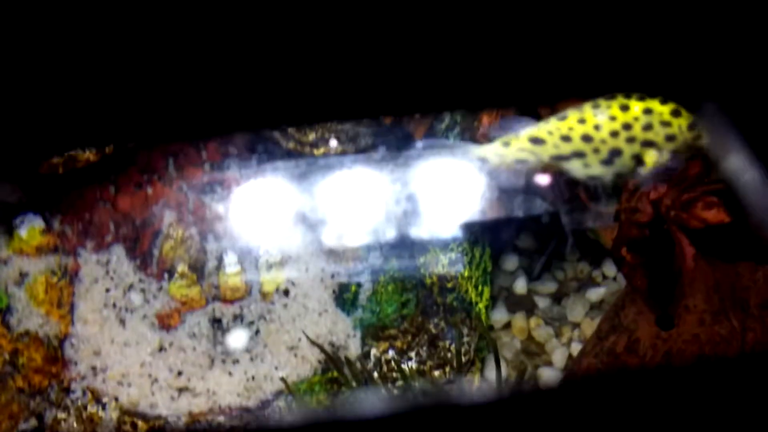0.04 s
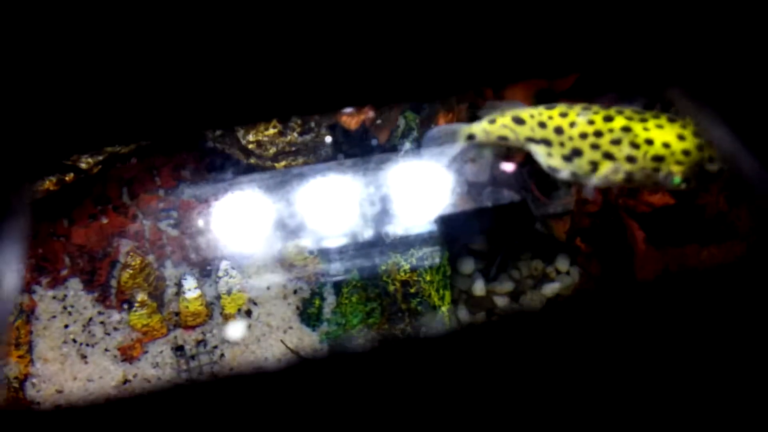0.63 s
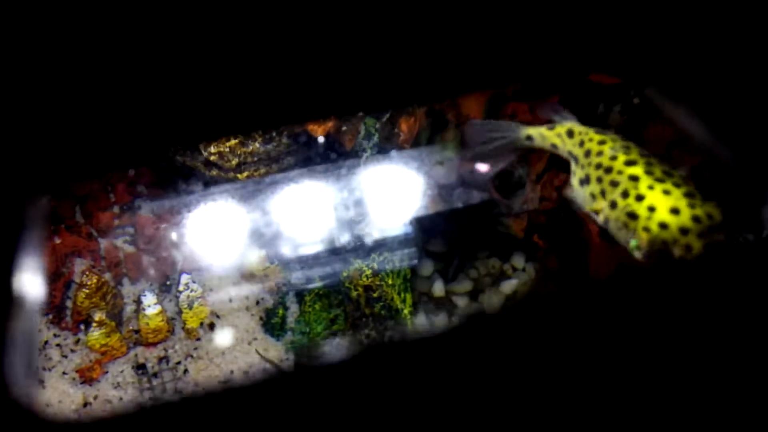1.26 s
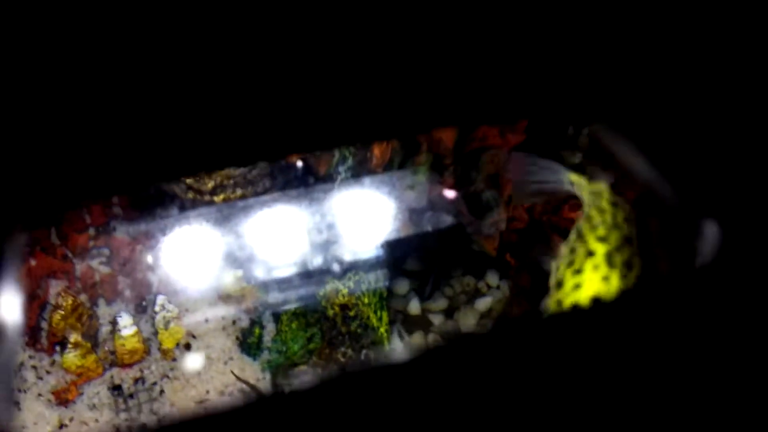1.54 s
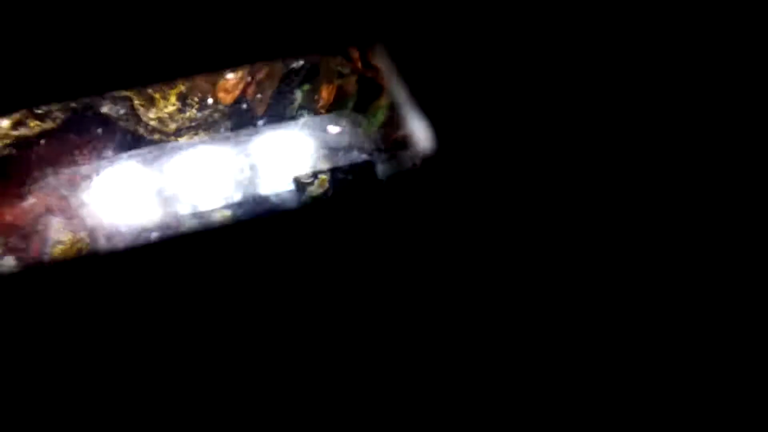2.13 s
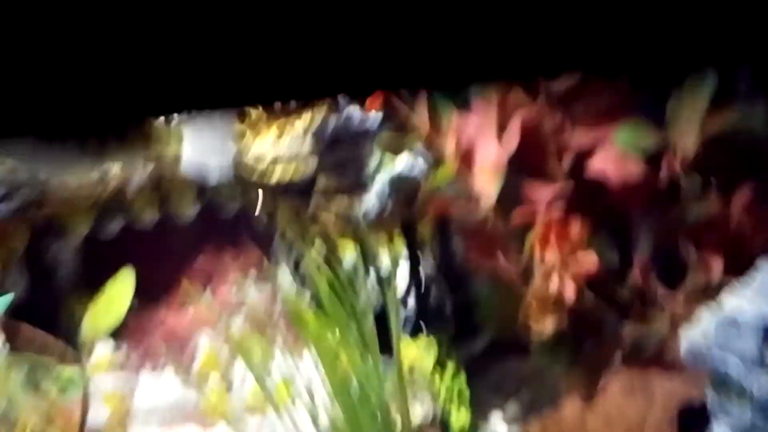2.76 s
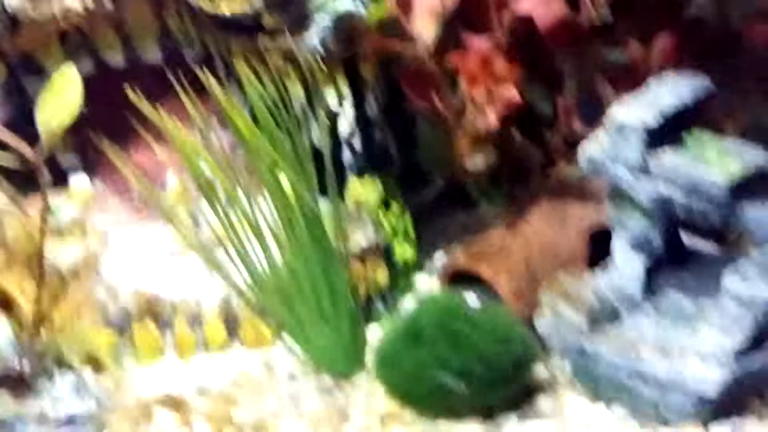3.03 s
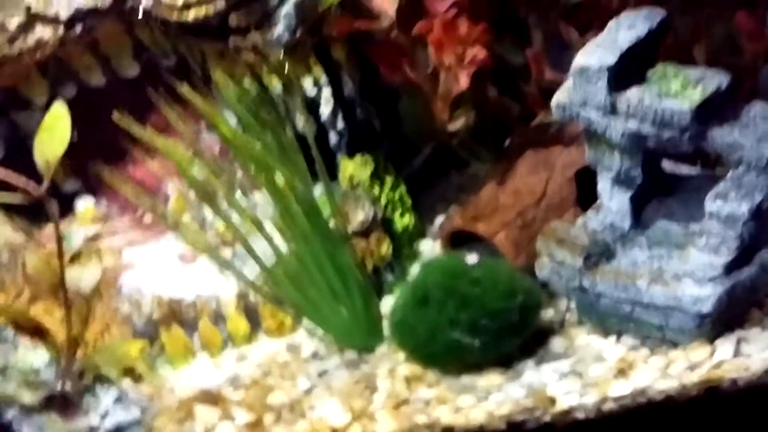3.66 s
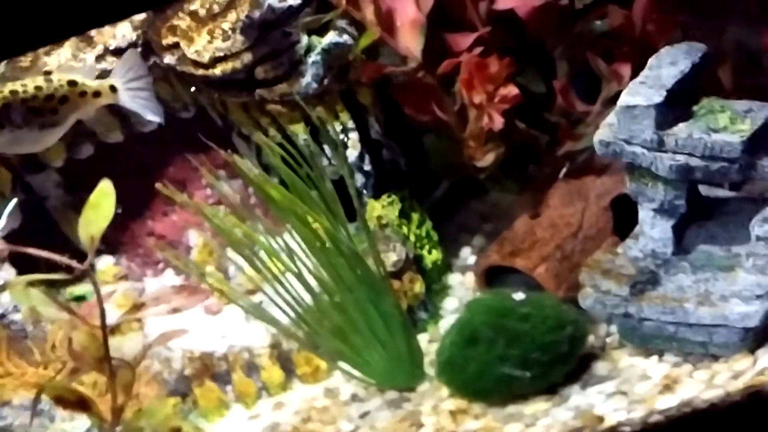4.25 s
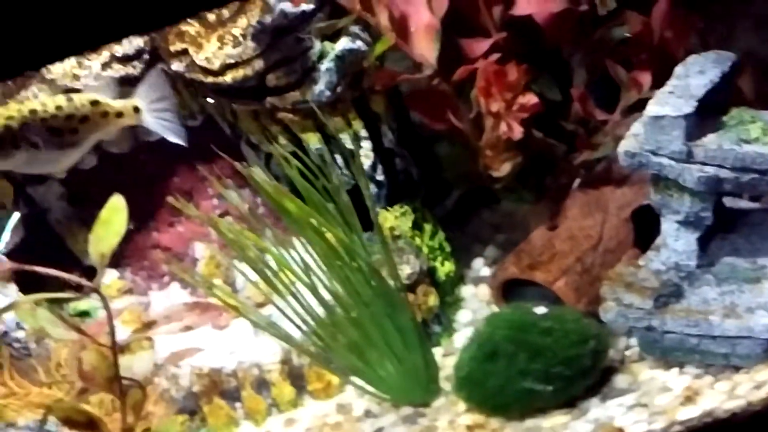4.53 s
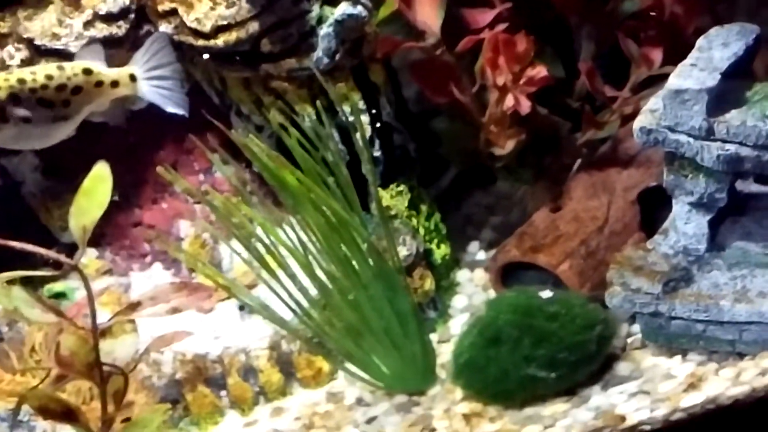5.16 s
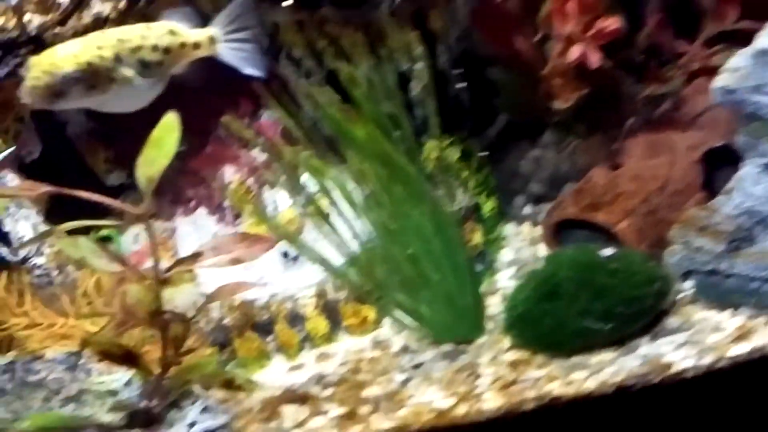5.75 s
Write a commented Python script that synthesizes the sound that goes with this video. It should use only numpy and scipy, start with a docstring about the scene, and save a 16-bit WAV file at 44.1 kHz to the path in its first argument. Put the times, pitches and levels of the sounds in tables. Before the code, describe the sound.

Fingers rub, click and bump on a handheld camera's microphone, over the faint hum of an aquarium in a quiet room.

```python
"""A quiet room with a humming aquarium, where a small stereo camera is shifted in the hand.
Finger skin slips in tiny jerks over the two microphone ports, sounding the hollow case and the port
cavities. It catches on the rims with sharp clicks that overload the input; fingers bump the case.
Later a sleeve scuffs the camera once. A thin whine comes and goes over rumble, room noise and hiss."""
import sys
import numpy as np
from scipy import signal
from scipy.fft import rfft, irfft, next_fast_len
from scipy.io import wavfile
from scipy.ndimage import uniform_filter1d

SR = 44100
rng = np.random.default_rng(int(sys.argv[2]) if len(sys.argv) > 2 else 0)


def int16_out(signal):
    """Quantize to a 16-bit WAV file."""
    q = np.round(np.clip(np.atleast_2d(signal).T, -1, 1) * 32767)
    wavfile.write(sys.argv[1], SR, q.astype(np.int16))


N = 264159
TIME_S = np.arange(N) / SR

# finger slides: full_grip_s, hold_s, rise_s, fade_s, body_left_db, body_right_db,
# fizz_left_db, fizz_right_db, body_pitch_ratio
SLIDES = [(0.065, .005, 0.0039, .085, -59.5, -69.5, -60, -73.5, 1),
          (0.43, 0.087, 0.076, .04, -76.5, -89, -88, -87, 1),
          (0.601, 0.17, 0.081, .07, -55.5, -67.5, -51, -53, 1),
          (1.539, 0.015, 0.01, .045, -41, -45.5, -53.5, -46, .54),
          (2.03, 0.034, 0.037, .024, -46, -41.5, -48, -41, .89),
          (2.398, .005, 0.0074, .065, -55, -60, -57.5, -70, 1.2),
          (2.457, .025, 0.0086, .03, -46.5, -61.5, -41.5, -57, 1.3),
          (2.487, .036, 0.01, .025, -24, -43.5, -27.5, -49, 1.33),
          (2.551, .022, 0.06, .04, -42, -58, -39, -54, 1.3),
          (2.674, .045, 0.016, .03, -49.5, -60, -54, -62.5, 1.1),
          (2.753, .018, 0.032, .06, -36, -33, -38, -32, 1),
          (2.809, .042, 0.012, 0.038, -22, -26, -40, -25.5, 1),
          (2.871, .025, 0.019, .035, -21, -29.5, -20, -34, 1.05),
          (2.937, 0.048, 0.037, 0.15, -30.5, -39.5, -44, -41, .97),
          (3.099, 0.039, .075, 0.027, -27.5, -37, -44.5, -36.5, .8),
          (3.159, .012, .02, 0.051, -47.5, -51, -52.5, -53, .8),
          (3.214, 0.025, 0.0063, .06, -33, -34, -46, -32, 1),
          (3.297, .02, .048, .085, -28.5, -32, -34, -26.5, 1),
          (3.445, .02, 0.032, .055, -33.5, -45, -39.5, -37.5, .95),
          (3.496, .018, 0.023, .045, -41.5, -45, -46.5, -47, 1.05),
          (3.564, 0.038, .035, 0.021, -54.5, -63.5, -53.5, -64, 1.2),
          (3.606, 0.02, 0.016, .026, -25, -49, -16.5, -40, 1.48),
          (3.657, .002, 0.011, 0.0075, -39, -46.5, -41.5, -46.5, 1.3),
          (3.704, 0.0058, 0.014, .02, -73, -66, -74, -65, .9),
          (3.959, .04, .012, .045, -56.5, -59, -65, -59, .76)]
# slide spectra per port, case (body) and port cavity (fizz): freq_hz, gain_db
BODY_LEFT_SPECTRUM = [(100, -22.5), (220, -10.5), (350, -8), (600, -3), (760, -3), (870, -3), (1030, -2.5),
                      (1300, -7), (1800, -14), (2600, -18), (4500, -27), (12000, -62)]
BODY_RIGHT_SPECTRUM = [(100, -18), (220, -14), (350, 2.5), (500, -3.5), (880, 1), (1300, -6), (1900, -1),
                       (2600, -9), (4500, -25.5), (12000, -48.5)]
FIZZ_LEFT_SPECTRUM = [(600, -27.5), (2000, -7.5), (3200, -3.5), (4600, -7), (6300, -7), (9000, 1),
                      (11000, -4.5), (12500, -10), (14500, -11.5), (16000, -27)]
FIZZ_RIGHT_SPECTRUM = [(600, -29), (2000, -6.5), (3400, -2), (5800, -2), (7600, 2.5), (9000, -1.5),
                       (10500, -9.5), (12500, -11.5), (14500, -17), (16000, -24)]
# skin catching on a port: start_s, knock_db, rim_db, snap_db, snap_hz, left_minus_right_db
CLICKS = [(0.0632, -47.5, -68, -70, 10700.0, 12), (2.0635, -48, -40.5, -59, 8200.0, -14),
          (2.3947, -48.5, -56, -52.5, 7900.0, 29), (2.6625, -43.5, -60, -64.5, 9600.0, 9.5),
          (2.6852, -43, -52, -61.5, 9500.0, 21), (2.693, -19, -20, -14, 8200.0, 8.5),
          (2.7306, -38, -16.5, -9.5, 9500.0, -3.5), (2.753, -29, -34.5, -38, 6900.0, 14),
          (2.7614, -31.5, -18.5, -28, 7200.0, 8), (2.7682, -23.5, -24, -37.5, 7200.0, 2),
          (2.8057, -21.5, -35.5, -40, 7500.0, -10), (2.9232, -32, -20, -20, 8200.0, 10),
          (2.935, -17.5, -31, -20, 7700.0, 8), (2.9676, -21, -32, -54, 7700.0, 10),
          (3.005, -43, -46.5, -72.5, 8800.0, 15.5), (3.145, -23.5, -37, -41.5, 9700.0, 7),
          (3.4156, -17, -24, -26, 8300.0, 3), (3.4471, -27, -20, -14, 8700.0, 6.5),
          (3.4836, -31, -51.5, -47.5, 8300.0, 20.5), (3.4972, -22.5, -20, -19.5, 8200.0, 3),
          (3.6078, -38, -25, -13.5, 9000.0, 3), (3.6608, -50, -33.5, -38.5, 8200.0, 10.5),
          (3.772, -82, -82, -73, 9060, 5), (3.86, -74, -84, -69, 7990, -12),
          (5.03, -43, -39.5, -65, 9000.0, 7)]
# case and rim modes: freq_hz, gain_db, t60_s
CASE_MODES = [(422, -10.5, 0.014), (880, 7, 0.01), (1250, 11, 0.0063)]
RIM_MODES = [(2020, 1, .004), (2680, -1, 0.0046), (3780, -6.5, 0.0086)]
# finger blows on the case: start_s, level_db, pitch_hz, t60_s, left_minus_right_db
BUMPS = [(0.0653, -19.5, 208, 0.016, 15), (0.072, -36.5, 71, 0.1, 9), (1.788, -65, 418.9, .09, -4),
         (1.97, -36, 110, 0.029, -10), (2.047, -35.5, 144, 0.058, -31), (2.065, -27.5, 257, 0.018, -16),
         (2.206, -33.5, 84, 0.045, -11), (2.208, -37.5, 336, 0.02, -15), (2.719, -31.5, 110, 0.055, -6.5),
         (2.744, -25, 115, .09, -7.5), (2.7523, -11, 520, 0.014, 4.5), (2.806, -11, 300, 0.017, -10.5),
         (2.966, -22.5, 420, 0.034, 11), (3.1315, -15.5, 118, 0.08, 34), (3.1431, -6, 367, 0.01, 18.5),
         (3.1477, -3, 190, .045, 9), (3.151, -30.5, 52.6, .11, 14), (3.160, -11, 102, 0.053, -11),
         (3.18, -35.5, 85, 0.19, -4), (3.948, -50, 509, 0.043, 8), (4.176, -56, 334, 0.11, 4),
         (5.027, -56, 217, .03, 10), (5.415, -61, 520, 0.054, 3)]
# strokes of the sleeve scuff: full_contact_s, hold_s, rustle_db, boom_db
SCUFF_STROKES = [(4.98, 0.017, -35.5, -68), (5.022, 0.0095, -33, -42), (5.07, 0.016, -52.5, -49)]
# case resonances under cloth: freq_hz, width_hz, gain_db
SCUFF_MODES = [(323, 60, -5), (513.5, 22, -1.5), (864, 44, -8.5), (1132, 32, -3), (1435, 56, -10.5),
               (2050, 110, -15), (4070, 44, -23)]
# cloth and case spectra: freq_hz, gain_db
RUSTLE_SPECTRUM = [(200, -19), (400, 3), (700, 10.5), (1200, 1), (2400, -8), (3500, -15), (6000, -4),
                   (9500, 3), (12500, -6), (15500, -7), (16500, -37)]
BOOM_SPECTRUM = [(60, -23), (95, -24), (135, 11), (220, -2.5), (320, -0.5), (450, -10), (900, -35)]
# thin whines: start_s, top_s, end_s, top_hz, base_db
WHINES = [(.05, .62, 2.44, 9140, -84.5), (2.94, 3.012, 3.06, 9080, -53), (4.4, 4.75, 5.6, 7880, -100)]
# friction resonances: centre_s, half_length_s, pitch_hz, width_hz, level_db
FRICTION_RINGS = [(.47, .13, 3430, 350, -92), (.49, 0.12, 4730, 600, -89), (5.8, 0.46, 2280, 450.4, -93.5)]
# creep of the resting hand: centre_s, half_length_s, level_db
CREEPS = [(1.2, 2.8, -85), (3.8, 0.53, -79.5), (4.33, 0.045, -75), (4.38, 0.21, -83), (5.2, 0.66, -83.5),
          (5.95, .15, -85.5)]
# creep and grip squeak spectra: freq_hz, gain_db
CREEP_SPECTRUM = [(2000, -24.5), (6000, -12.5), (7700, -4.5), (9000, 0.5), (10800, -3), (12500, -6.5),
                  (14000, -21.5)]
SQUEAK_SPECTRUM = [(300, -15.5), (620, -16), (750, 19), (900, -6), (2900, -14), (3350, 3), (3800, -19),
                   (7000, -16), (9500, 5), (16000, -14)]
# weight shifts of the hand: peak_s, left_db, right_db
HAND_SHIFTS = [(.125, -48, -54), (.55, -56.5, -60), (1.532, -54, -56), (1.98, -62, -48), (2.2, -57, -52),
               (2.48, -53.5, -62), (2.73, -44.5, -42), (3.22, -59.5, -42), (3.47, -66, -57),
               (3.6, -55.5, -66.5), (3.97, -64, -64), (4.47, -65.5, -70), (4.62, -65, -75),
               (5.88, -66, -65)]
# room noise swells: centre_s, half_length_s, level_db
ROOM_SWELLS = [(.55, 0.44, -68), (1.55, 0.25, -68), (1.8, 0.062, -63), (1.965, 0.1, -57.5),
               (2.15, 0.3, -67.5), (3.7, 0.078, -64.5), (3.94, 0.26, -66), (4.32, 0.082, -72),
               (4.92, .06, -80), (5.45, .14, -72), (5.69, .13, -67), (5.95, 0.16, -65.5)]
# aquarium pump partials: freq_hz, rms_db
PUMP_PARTIALS = [(59.8, -73.5), (120, -77.5), (179.7, -73.5), (300, -84.5)]
# background spectra: freq_hz, gain_db
RUMBLE_SPECTRUM = [(15, -25), (30, -8), (52, 3), (80, -2.5), (125, -6), (190, -7.5), (300, -20), (600, -53)]
ROOM_SPECTRUM = [(120, -20), (250, -7.5), (340, 5), (480, -1), (750, -6.5), (1050, -25.5), (1600, -45),
                 (4000, -61.5)]
HISS_SPECTRUM = [(500, 2.5), (2400, 6), (5500, 1), (8500, 2), (12000, 0), (13500, -14.5), (16000, -13)]


def finger_slides(body_gains, fizz_gains, pitch_ratio, echo_gain=0.073, echo_s=.0016):
    """Each port hears its own finger: a hollow body through the case, fizz from the port's cavity."""
    spectra = [(BODY_LEFT_SPECTRUM, FIZZ_LEFT_SPECTRUM), (BODY_RIGHT_SPECTRUM, FIZZ_RIGHT_SPECTRUM)]
    read_index = np.cumsum(pitch_ratio) % N  # a tighter hollow runs its resonances faster
    hollow = signal.iirpeak(850, Q=8, fs=SR)
    out = np.zeros((2, N))
    for port, (body_spectrum, fizz_spectrum) in enumerate(spectra):
        body = coloured(skin_slips(per_s=20000, spread_db=1.1, waver_db=1.4), body_spectrum)
        body = unit_rms(body + .7 * signal.lfilter(*hollow, body))
        body = np.interp(read_index, np.arange(N), body)
        fizz = coloured(skin_slips(per_s=33000, spread_db=0.13, waver_db=2.05), fizz_spectrum)
        fizz = patchy(fizz[None], depth_db=0.05)[0]
        fizz = unit_rms(fizz + echo_gain * np.interp(TIME_S - echo_s, TIME_S, fizz))
        out[port] = body_gains[port] * body + fizz_gains[port] * fizz
    return out


def finger_grip(graze_db=-14, graze_max_db=-61.5, graze_fade_s=0.067):
    """Slide gains and body pitch: each finger presses, eases off, then still grazes the port."""
    power, pitch_sum, weight = np.zeros((4, N)), np.zeros(N), np.zeros(N)
    for at_s, hold_s, rise_s, fade_s, *levels_db, pitch_ratio in SLIDES:
        db = np.array(levels_db)[:, None]
        grip = gain_of(db) * touch(at_s, hold_s, rise_s, fade_s, sag_db_per_s=42)
        graze_gain = gain_of(np.minimum(db + graze_db, graze_max_db))
        graze = graze_gain * touch(at_s, hold_s, rise_s, graze_fade_s)
        power += grip ** 2 + graze ** 2
        pitch_sum += pitch_ratio * grip[0] ** 2  # the firmest finger on the left dominates
        weight += grip[0] ** 2
    body_gains, fizz_gains = np.sqrt(power[:2]), np.sqrt(power[2:])
    return body_gains, fizz_gains, pitch_sum / weight


def skin_slips(per_s, spread_db, waver_db):
    """Skin ridges slip in tiny, unequal jerks while the grip wavers."""
    jerks = (rng.random(N) < per_s / SR) * rng.standard_normal(N)
    return jerks * gain_of(spread_db * rng.standard_normal(N) + waver_db * drift(130))


def port_clicks(snap_s=0.00033, snap_log_width=0.22, lag_s=0.00015):
    """Released skin snaps the air in a port and rings rim and case; the far port hears it later."""
    out, t = np.zeros((2, N)), np.arange(1024) / SR
    norm = np.sqrt(220)  # each part carries the energy of 5 ms at its level
    for start_s, knock_db, rim_db, snap_db, snap_hz, side_db in CLICKS:
        edges_hz = np.clip(snap_hz * np.exp([-snap_log_width, snap_log_width]), 100, .48 * SR)
        burst = rng.standard_normal((2, len(t))) * t / snap_s * np.exp(-t / snap_s)
        snaps = signal.lfilter(*signal.butter(2, edges_hz, "bandpass", fs=SR), burst)
        for port, is_far in enumerate([side_db < 0, side_db >= 0]):
            knock = struck_modes(CASE_MODES, t, rise_s=0.0023)
            rim = struck_modes(RIM_MODES, t, rise_s=0.00014)
            parts = [(knock_db, knock), (rim_db, rim), (snap_db, snaps[port])]
            click = sum(gain_of(db) * part * norm / np.linalg.norm(part) for db, part in parts)
            add(out[port:port + 1], start_s + is_far * lag_s, pan(side_db)[port] * click)
    return out


def struck_modes(modes, t, rise_s):
    """Decaying sines, detuned at random for each blow."""
    ringing = sum(gain_of(db - 60 * t / t60_s) * np.sin(2 * np.pi * hz * rng.uniform(0.85, 1.2) * t)
                  for hz, db, t60_s in modes)
    return ringing * (1 - np.exp(-t / rise_s))


def case_bumps(rise_s=0.00061, pitch_drop=.2):
    """Padded finger blows: a few low cycles that sink in pitch."""
    out, t = np.zeros((2, N)), np.arange(8192) / SR
    for start_s, db, hz, t60_s, side_db in BUMPS:
        cycles = np.cumsum(hz * (1 - pitch_drop * np.minimum(t / t60_s, 1))) / SR
        envelope = gain_of(db - 60 * t / t60_s) * (1 - np.exp(-t / rise_s))
        add(out, start_s, pan(side_db) * envelope * np.sin(2 * np.pi * cycles))
    return out


def sleeve_scuff(rise_s=.013):
    """Cloth drags over the left of the case, which rings narrowly and booms after it."""
    rustle_gain, boom_gain = np.zeros((2, N))
    for at_s, hold_s, rustle_db, boom_db in SCUFF_STROKES:
        rustle_gain += gain_of(rustle_db) * touch(at_s, hold_s, rise_s, fade_s=.028)
        boom_gain += gain_of(boom_db) * touch(at_s, hold_s, rise_s, fade_s=.075)
    drag = stereo_noise(shared=0.25) * gain_of(1.6 * drift(122.4))
    rings = sum(gain_of(db) * signal.lfilter(*signal.iirpeak(hz, hz / width_hz, fs=SR), drag)
                for hz, width_hz, db in SCUFF_MODES)
    rustle = unit_rms(pan(9.3) * coloured(drag, RUSTLE_SPECTRUM) + pan(2.6) * unit_rms(rings))
    boom = pan(4.0) * coloured(stereo_noise(shared=0.76), BOOM_SPECTRUM)
    return rustle_gain * rustle + boom_gain * boom


def whine(fizz_gain, swoop_hz=560, sink_hz=390, jitter_hz=50, fizz_share_db=-14, flutter_db=2):
    """A thin, unsteady whistle, fed by the sliding fingers: it swoops up, then sinks."""
    out = np.zeros(N)
    for start_s, top_s, end_s, top_hz, base_db in WHINES:
        swoop = np.interp(TIME_S, [start_s, top_s], [1, 0]) ** 2
        sink = np.interp(TIME_S, [top_s, end_s], [0, 1])
        hz = top_hz - swoop_hz * swoop - sink_hz * sink + jitter_hz * drift(200)
        gate = touch(start_s, end_s - start_s, rise_s=.02, fade_s=.02)
        rms = gate * np.hypot(gain_of(base_db), gain_of(fizz_share_db) * fizz_gain)
        out += rms * np.sqrt(2) * np.sin(2 * np.pi * np.cumsum(hz) / SR)
    return out * gain_of(flutter_db * drift(90))


def grip_squeak(centre_s=4.33, half_length_s=0.022, level_db=-72):
    """One faint squeak of the grip: a puff of resonant noise."""
    envelope = gain_of(level_db) * np.exp(-((TIME_S - centre_s) / half_length_s) ** 2)
    return envelope * coloured(stereo_noise(shared=0.92), SQUEAK_SPECTRUM)


def hand_creep():
    """The resting hand still slips a little: a fine, high crackle."""
    ports = [coloured(skin_slips(per_s=8600, spread_db=0.5, waver_db=1.5), CREEP_SPECTRUM)
             for _ in range(2)]
    return swells(CREEPS) * np.array(ports)


def friction_rings():
    """Light friction rings narrow resonances."""
    out = np.zeros((2, N))
    for centre_s, half_s, hz, width_hz, db in FRICTION_RINGS:
        band = signal.butter(2, [hz - width_hz / 2, hz + width_hz / 2], "bandpass", fs=SR)
        ringing = unit_rms(signal.lfilter(*band, stereo_noise(shared=0.24)))
        out += swells([(centre_s, half_s, db)]) * ringing
    return out


def room_echo(x, t60_s=.55, delay_s=.006, highpass_hz=5000):
    """The room returns the treble as a diffuse tail."""
    t = np.arange(SR // 2) / SR
    tail = rng.standard_normal((2, len(t))) * gain_of(-60 * t / t60_s) * (t > delay_s)
    wet = signal.fftconvolve(x.mean(0)[None], tail / np.linalg.norm(tail[0]), axes=1)[:, :N]
    return signal.lfilter(*signal.butter(1, highpass_hz, "highpass", fs=SR), wet)


def case_rumble(floor_db=-68.5):
    """The case rumbles as the hand shifts its weight."""
    shifts = sum(gain_of([[left_db], [right_db]]) * touch(at_s, hold_s=.025, rise_s=.075, fade_s=0.089)
                 for at_s, left_db, right_db in HAND_SHIFTS)
    envelope = np.hypot(shifts, gain_of(floor_db + 1.5 * drift(8)))
    return envelope * coloured(stereo_noise(shared=0.79), RUMBLE_SPECTRUM)


def room_noise(floor_db=-81.5):
    """Dull noise in small swells."""
    envelope = np.hypot(swells(ROOM_SWELLS), gain_of(floor_db)) * gain_of(1.5 * drift(15))
    return envelope * patchy(coloured(stereo_noise(shared=0.45), ROOM_SPECTRUM), depth_db=3.0)


def pump_hum(wander_rad=.25):
    """The aquarium pump hums in low partials of wandering phase."""
    return sum(gain_of(db) * np.sqrt(2) * np.sin(2 * np.pi * hz * TIME_S + wander_rad * drift(10))
               for hz, db in PUMP_PARTIALS)


def hiss(level_db=-91):
    """Faint broadband noise floor."""
    return gain_of(level_db) * patchy(coloured(stereo_noise(shared=.3), HISS_SPECTRUM), depth_db=2.5)


def touch(at_s, hold_s, rise_s, fade_s, sag_db_per_s=0):
    """Gain: rounded rise to at_s, hold, fade; rise_s and fade_s each span 20 dB."""
    t = TIME_S - at_s
    before, after = np.minimum(t, 0) / rise_s, np.maximum(t - hold_s, 0) / fade_s
    sag_db = sag_db_per_s * np.clip(t, 0, hold_s)
    return gain_of(np.maximum(-20 * (before ** 2 + after) - sag_db, -200))


def swells(rows):
    """Joint gain of rounded swells, each 20 dB down at its ends."""
    return np.sqrt(sum(gain_of(db - 20 * np.minimum(((TIME_S - centre_s) / half_s) ** 2, 10)) ** 2
                       for centre_s, half_s, db in rows))


def patchy(x, depth_db):
    """Narrow bands swell and fade independently; rms 1."""
    bins = signal.stft(x, nperseg=2048, noverlap=1536)[2]
    patches = uniform_filter1d(rng.standard_normal(bins.shape[1:]), size=4, axis=0)
    patches = unit_rms(uniform_filter1d(patches, size=7, axis=1))
    bins = bins * gain_of(depth_db * patches)
    return unit_rms(signal.istft(bins, nperseg=2048, noverlap=1536)[1][:, :N])


def coloured(x, spectrum):
    """x filtered by a spectrum; rms 1."""
    size = next_fast_len(N)
    hz, db = np.transpose(spectrum)
    shape = gain_of(np.interp(np.log(np.fft.rfftfreq(size, 1 / SR) + 1), np.log(hz), db))
    return unit_rms(irfft(rfft(x, size) * shape, size)[..., :N])


def drift(rate_hz):
    """Random wander below rate_hz; rms 1."""
    size = next_fast_len(N)
    slow = np.fft.rfftfreq(size, 1 / SR) < rate_hz
    return unit_rms(irfft(rfft(rng.standard_normal(size)) * slow, size)[:N])


def stereo_noise(shared):
    """White noise with a share of its power common to both ports."""
    return np.sqrt(shared) * rng.standard_normal(N) + np.sqrt(1 - shared) * rng.standard_normal((2, N))


def pan(side_db):
    """Left and right gains of mean power 1."""
    return unit_rms(gain_of([[side_db / 2], [-side_db / 2]]))


def gain_of(db):
    return 10 ** (np.asarray(db) / 20)


def unit_rms(x):
    return x / np.sqrt(np.mean(x ** 2) + 1e-20)


def add(mix, start_s, sound):
    part = mix[:, round(start_s * SR):][:, :sound.shape[-1]]
    part += sound[..., :part.shape[-1]]


def scene(echo_db=-37.5):
    """Handling noise with a little room echo, over bumps, whine and background."""
    body_gains, fizz_gains, pitch_ratio = finger_grip()
    handling = finger_slides(body_gains, fizz_gains, pitch_ratio) + port_clicks() + sleeve_scuff()
    handling += grip_squeak() + hand_creep() + friction_rings()
    mix = handling + gain_of(echo_db) * room_echo(handling) + case_bumps() + whine(fizz_gains.mean(0))
    return mix + case_rumble() + room_noise() + pump_hum() + hiss()


def record(dry, ceiling=.92, cutoff_hz=16000):
    """The loudest peaks overload the input; a low-pass follows."""
    lowpass = signal.firwin(255, cutoff_hz, window=("kaiser", 8), fs=SR)
    return signal.oaconvolve(np.clip(dry, -ceiling, ceiling), lowpass[None], "same")


dry = scene()
out = record(dry)
int16_out(out)
```